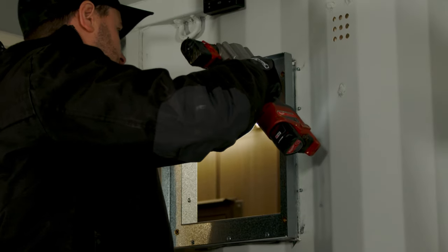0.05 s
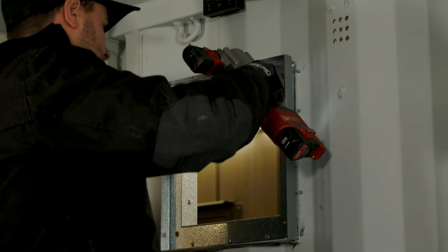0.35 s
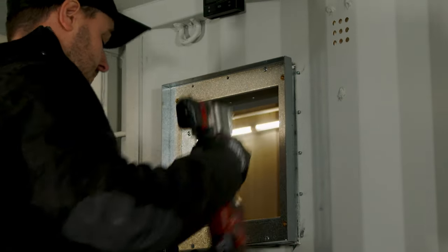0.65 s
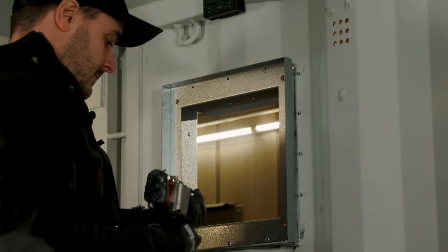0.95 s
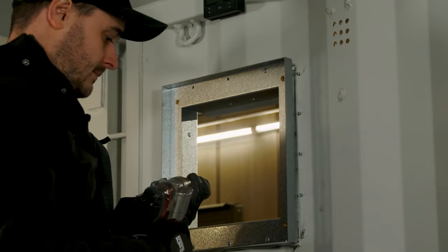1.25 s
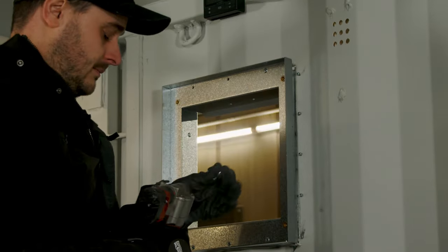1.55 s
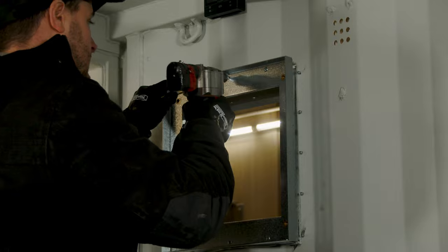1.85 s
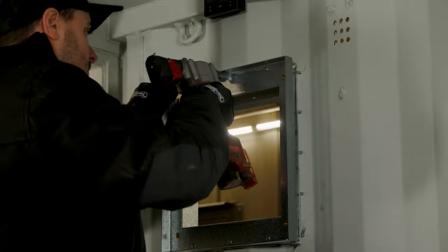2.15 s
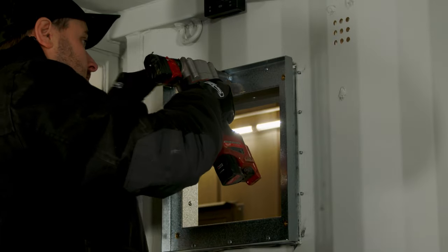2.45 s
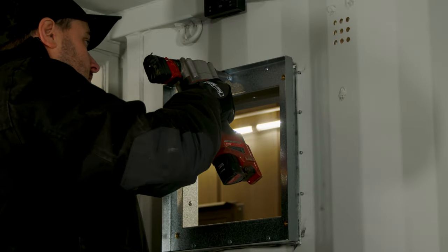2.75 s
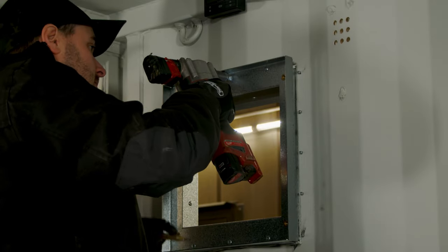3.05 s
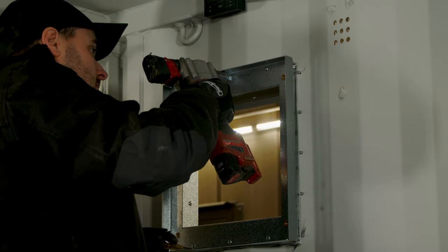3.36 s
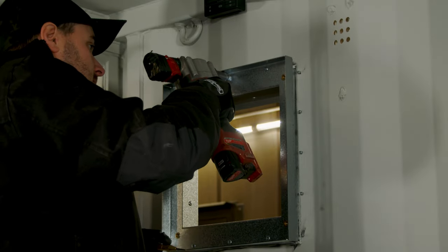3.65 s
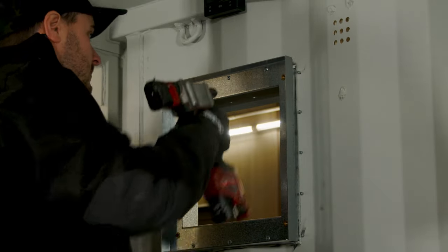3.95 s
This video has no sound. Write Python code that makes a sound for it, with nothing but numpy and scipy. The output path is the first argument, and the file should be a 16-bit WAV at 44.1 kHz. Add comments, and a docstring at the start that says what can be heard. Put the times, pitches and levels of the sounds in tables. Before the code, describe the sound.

A cordless rivet gun snaps a rivet right at the start, a sharp, close bang that rings through a steel container. Its geared motor whirs back until about 1.5 seconds. Light clicks and knocks against a steel window frame follow around 1.9 to 2.4 seconds. The motor spins up at 2.5, drops in pitch as it labours, and a second bang comes at 3.6, with the walls booming.

```python
"""A cordless rivet gun fixes a steel window frame, heard close up on one microphone in a shipping container.
Its geared motor spins up, labours as it pulls the rivet, snaps the mandrel with a bang, stops, runs back.
Between two rivets the tool is handled and its nose rattles into the next hole.
All around, the steel walls boom after the hard knocks, over a low rumble of air."""
import sys
import numpy as np
from scipy import signal
from scipy.fft import rfft, irfft
from scipy.io import wavfile
from scipy.ndimage import uniform_filter1d, map_coordinates

SR = 44100
rng = np.random.default_rng(int(sys.argv[2]) if len(sys.argv) > 2 else 0)


def unload_audio(sound):
    """Save the sound as a 16-bit wav file, at the path given as the first command line argument."""
    columns = np.transpose(np.atleast_2d(sound))
    # keep every value between -1 and 1, then stretch to whole-number steps
    steps = np.round(np.clip(columns, -1, 1) * 32767)
    wavfile.write(sys.argv[1], SR, steps.astype(np.int16))


N = 176400


def undb(db):
    return 10 ** (np.asarray(db) / 20)

def unit(x):
    return x / np.sqrt(np.mean(x ** 2))

def add(out, at, x):
    i = int(at * SR)
    out[i:i + len(x)] += x[:N - i]

def fade(t, t60):
    return np.exp(-np.log(1000) * t / t60)

def lookup(hz, table, column=1):
    """A column of a table, read on a log-frequency axis."""
    table = np.array(table)
    return np.interp(np.log(np.maximum(hz, 1)), np.log(table[:, 0]), table[:, column])

def colour(x, table):
    """Give a sound a spectrum, at rms 1."""
    gain = undb(lookup(np.fft.rfftfreq(len(x), 1 / SR), table))
    return unit(irfft(rfft(x) * gain, len(x)))

def walk(rate_hz):
    """A smooth random wander, at rms 1."""
    hold = max(int(SR / rate_hz), 1)
    steps = rng.standard_normal(4096)[np.arange(N) // hold % 4096]
    return unit(uniform_filter1d(steps, hold))

def burst(table, size=65536):
    """Noise that starts at rms 1; each half octave dies at its own rate."""
    t, f = np.arange(size) / SR, np.fft.rfftfreq(size, 1 / SR)
    spectrum = rfft(colour(rng.standard_normal(size), table))
    centres = np.geomspace(35, 17000, 19)
    band = np.interp(np.log(f + 1), np.log(centres), np.arange(len(centres)))
    return sum(irfft(spectrum * np.maximum(1 - abs(band - k), 0)) * fade(t, lookup(hz, table, column=2))
               for k, hz in enumerate(centres))

def ring(modes, size=65536):
    """Struck modes, each fading on its own."""
    t = np.arange(size) / SR
    return sum(undb(db) * rng.choice([-1, 1]) * np.sin(2 * np.pi * hz * t) * fade(t, t60)
               for hz, db, t60 in modes)

def click(hz, attack_s, t60, octaves=0.85, size=4096):
    """A small contact of metal parts, centred on one pitch; a slow attack makes a short scrape."""
    t, f = np.arange(size) / SR, np.fft.rfftfreq(size, 1 / SR)
    band = np.exp(-(np.log2((f + 1) / hz) / octaves) ** 2)
    noise = unit(irfft(rfft(rng.standard_normal(size)) * band))
    return noise * (1 - np.exp(-t / attack_s)) * fade(t, t60)


# Room tone in the container. Each row: frequency in Hz, relative level in dB.
AIR_SPECTRUM = [(25, -2), (80, 0.5), (170, 5), (420, -10.5), (1000, -19.5), (3000, -26), (8000, -28.5),
                (15000, -33.5)]

def air():
    """A faint, steady rumble all around the microphone."""
    return undb(-64.5) * colour(rng.standard_normal(N), AIR_SPECTRUM)


# The container's echo. Each row: frequency in Hz, relative level in dB, t60 in seconds.
ECHO_BANDS = [(60, 4.5, 0.51), (440, 10.5, 0.94), (841, -10, 0.94), (1996, 0.5, 0.46), (7000, -2, .38),
              (14840, -0.5, 0.41)]

def container_echo(sound):
    """What reaches the microphone by way of the steel walls."""
    echo = burst(ECHO_BANDS)
    return signal.fftconvolve(sound, echo / np.sqrt(np.sum(echo ** 2)))[:N]


# Booms after the hard knocks and bangs. Each row: start in seconds, level in dB.
BOOM_EVENTS = [(0.0678, -35), (1.855, -57), (2.07, -42), (3.587, -34.5)]
# The walls' bass. Each row: frequency in Hz, relative level in dB, t60 in seconds.
BOOM_BANDS = [(24.9, -11, 0.92), (52.6, -20, 0.91), (77.5, 5, 2.7), (113, -7, 2.4), (139, -5, 3.1),
              (194.4, 2.5, 2.2), (258, -33.5, 0.35)]

def wall_booms(peak_s=0.22, width_s=0.11):
    """Bending waves spread over the steel walls, so the bass swells late, then lingers softly."""
    out = np.zeros(N)
    for at, db in BOOM_EVENTS:
        boom = burst(BOOM_BANDS)
        t = np.arange(len(boom)) / SR
        swell = np.exp(-((t - peak_s) / width_s) ** 2)
        linger = 0.85 * np.minimum(t / peak_s, 1)
        add(out, at, undb(db) * boom * (swell + linger))
    return out


# Ticks and scrapes: small ones at the tool, and the bright edges of the knocks at the window at 1.855 and 2.15
# s. Each row: start in seconds, level in dB, centre in Hz, attack in seconds.
TICK_EVENTS = [(.766, -26, 2200, 0.0028), (1.185, -31, 2580, 0.0012), (1.308, -36, 2440, 0.0004),
               (1.541, -45, 2952, 0.0007), (1.608, -42, 5070, 0.0019), (1.638, -43, 2103, 0.0022),
               (1.657, -45.5, 2390, 0.0013), (1.855, -26, 11000, 0.0033), (2.15, -21.5, 6400, 0.0072),
               (2.408, -40, 3540, 0.0044), (2.462, -31.5, 4420, 0.0061)]

def ticks():
    """Mechanism and rivet make small, quickly damped clicks and scrapes; two of the knocks at the window get a
    bright, short contact."""
    out = np.zeros(N)
    for at, db, hz, attack_s in TICK_EVENTS:
        add(out, at, undb(db) * click(hz, attack_s, t60=0.02))
    return out


# Knocks at the window. Each row: start in seconds, click level in dB, click centre in Hz, thud level in dB.
KNOCK_EVENTS = [(1.854, -34, 9000, -39.5), (1.882, -44, 4000, -47), (1.923, -45, 1700, -44),
                (2.033, -43.5, 3460, -44), (2.055, -28, 3120, -38), (2.0653, -37, 3900, -39),
                (2.074, -32, 5730, -36), (2.099, -25, 1770, -35), (2.109, -34, 1800, -40.5),
                (2.175, -35.5, 3500, -65), (2.243, -48.5, 3950, -49)]
# The knocked steel. Each row of all three: frequency in Hz, relative level in dB, t60 in seconds.
CLINK_BANDS = [(202, -9, 0.14), (690, 0.5, 0.065), (1610, 4, 0.1), (2480, -4, 0.14), (3770, -0.5, 0.1),
               (6160, -13, 0.19), (8500, -21, 0.074), (15000, -20, 0.075)]
THUD_BANDS = [(50, -13, 0.32), (132, 1.5, 1), (360, -8, 1), (606, -12, 1), (1400, -12, 0.64),
              (3030, -28, 0.68), (9900, -28.5, 0.17)]
THUD_MODES = [(151, -2, 0.41), (378.6, -0.5, 0.45), (426, -5.5, 0.36)]

def knocks():
    """The tool meets the frame: a sharp contact, a clink of the steel and a dull thud."""
    out = np.zeros(N)
    for at, click_db, hz, thud_db in KNOCK_EVENTS:
        add(out, at, undb(click_db) * click(hz, attack_s=1 / SR, t60=0.0081))
        add(out, at, undb(click_db - 7) * burst(CLINK_BANDS, size=8192))
        thud = undb(-4.5) * burst(THUD_BANDS, size=32768) + ring(THUD_MODES, size=32768)
        add(out, at, undb(thud_db) * thud)
    return out


# Rubbing inside the tool. Each row: peak in seconds from the snap, spread in seconds, centre in Hz,
# width in Hz, level in dB.
RASP_BANDS = [(-.58, .12, 10270, 348.5, -53.5), (-.2, .16, 5355, 601, -50), (-.36, .2, 12440, 504, -56.5),
              (-.1, .09, 10930, 910, -55), (.56, 0.098, 9880, 1600, -58), (.74, 0.25, 5750, 811, -60),
              (.74, 0.19, 11200, 1500, -64), (1.29, 0.19, 6270, 600, -57)]

def rasps(drift=0.013, flutter_db=3):
    """Sliding parts rub while the motor runs: one resonance after another swells, wavers and fades."""
    out, t = np.zeros(N), np.arange(N) / SR
    for peak, spread, hz, width_hz, db in RASP_BANDS:
        phase = 2 * np.pi * np.cumsum(hz * (1 + drift * walk(13))) / SR
        band = walk(width_hz) * np.sin(phase) + walk(width_hz) * np.cos(phase)
        swell = sum(np.exp(-((t - at - peak) / spread) ** 2 / 2) for at, *_ in SNAP_EVENTS)
        out += band * undb(db + flutter_db * walk(35)) * swell
    start_and_brake = [PULL_STROKE[0][0], PULL_STROKE[1][0], RETURN_STROKE[-3][0], RETURN_STROKE[-2][0]]
    running = sum(np.interp(t - at, start_and_brake, [0, 1, 1, 0]) for at, *_ in SNAP_EVENTS)
    return out * running


# The gears' rattle, running free and under load. Each row: frequency in Hz, relative level in dB.
FREE_SPECTRUM = [(100, -15.5), (400, -1.5), (800, -3.5), (1150, -11.5), (1600, -4), (2250, 3), (2900, -2),
                 (3900, -3.5), (5100, -10.5), (6350, -6.5), (7000, -10), (8400, -18.5), (10500, -16),
                 (11800, -14.5), (15500, -19)]
LOADED_SPECTRUM = [(100, -13.5), (330, -13.5), (650, -1.5), (980, 4), (1200, -3), (1410, 4), (1630, -1.5),
                   (1920, 3.5), (2230, -5), (2480, -3), (3050, -12), (3500, -4), (4700, -5.5), (5400, -4),
                   (6200, -7), (8700, -16), (10300, -10), (12600, -12.5), (13500, -18), (15500, -19)]
PLANET_RATIO = 0.146  # planet turns per meshing tooth

def gear_rattle(hz, teeth, load, running, repeat_share=0.35):
    """Worn teeth scrape in a pattern that partly repeats as the gears turn; load shifts its colour."""
    mesh = 2 * np.pi * teeth
    wear = rng.standard_normal(1024)
    worn = map_coordinates(wear, [teeth * PLANET_RATIO / 2 % 1 * len(wear)], order=3, mode="grid-wrap")
    scrape = np.sqrt(repeat_share) * worn + np.sqrt(1 - repeat_share) * rng.standard_normal(N)
    pulsing = (1 + 0.19 * np.cos(mesh)) * (1 + 0.067 * np.cos(PLANET_RATIO * mesh))
    grit = undb(walk(400))
    scrape *= pulsing * grit
    # Each tooth partly repeats the scrape of the last, so the rattle follows the pitch.
    last_tooth = map_coordinates(scrape, [np.arange(N) - SR / hz], order=1, mode="nearest")
    scrape = (scrape + 0.13 * last_tooth) * running
    rattle = (1 - load) * colour(scrape, FREE_SPECTRUM) + load * colour(scrape, LOADED_SPECTRUM)
    return rattle * np.sqrt(running.mean())


# Gear overtones. Each row: multiple of the mesh rate, free and loaded levels in dB against the rattle.
OVERTONES = [(2, -9.5, -15), (3, -16, -14), (9, -21, -40)]
# Side tones of the planet gears. Each row: mesh multiple, planet turns added, dB against the rattle.
PLANET_TONES = [(1, -1, -17), (1, 1, -19), (2, -1, -21), (3, -1, -17), (3, -2, -14)]

def gear_whine(mesh, load, strain, whine_db, overtone_gain, flutter_db=3, radiate_hz=426):
    """Meshing teeth sing a fluttering stack of tones; the small housing radiates little of their bass."""
    depth_db = flutter_db * (0.5 + strain)
    overtones = sum(undb(free + (loaded - free) * strain + depth_db * walk(50)) * np.sin(round(k) * mesh)
                    for k, free, loaded in OVERTONES)
    planets = sum(undb(db + flutter_db * walk(30)) * np.sin((round(k) + round(j) * PLANET_RATIO) * mesh)
                  for k, j, db in PLANET_TONES)
    fundamental = undb(whine_db - 1.5 + depth_db * walk(40)) * np.sin(mesh)
    whine = fundamental + overtone_gain * (overtones + (1 - load) * planets)
    return signal.sosfilt(signal.butter(3, radiate_hz, "high", fs=SR, output="sos"), whine)


# The motor close up, pulling and running back. Each row: time in seconds from the snap, gear mesh rate
# in Hz, relative whine level in dB, rattle level in dB, load from 0 to 1.
PULL_STROKE = [(-1.11, 60, -68, -65, 0.86), (-1.08, 150, -52, -54, 0.76), (-1.04, 310, -73, -55, 0.52),
               (-.986, 460, -48.5, -51, 0.53), (-.936, 715, -48.5, -46.5, 0.51),
               (-.876, 780, -39, -43.5, 0.61), (-.786, 797, -39, -45.5, 0.42),
               (-.735, 788, -42.5, -41.5, 0.57), (-.675, 745, -50, -37.5, 0.89),
               (-.616, 610, -55, -37.5, 0.99), (-0.46, 490, -36, -37.5, 0.97),
               (-.45, 482, -48.5, -39, 0.87), (-.34, 485, -40, -37, 0.91), (-.22, 458, -52.5, -38.5, 1),
               (-.052, 482, -41, -38.5, 0.95), (0, 500, -47.5, -36, 0.96), (.03, 590, -54, -40, 0.5),
               (0.21, 1100, -63, -46.5, 0.8), (.24, 160, -76, -82, 0.6)]
RETURN_STROKE = [(.26, 59.9, -80, -60, 0.78), (.375, 203.5, -59, -59, 0.35), (.44, 555, -50, -51.5, 0.14),
                 (.51, 745, -52, -48, .25), (.57, 789, -46, -45.5, 0.18), (.7, 795.2, -49.5, -47, 0.25),
                 (.95, 800, -48, -48, 0), (1.18, 796.5, -44, -48.5, 0.18),
                 (1.432, 800, -45.5, -48.5, 0.068), (1.453, 639, -75, -48.5, 0),
                 (1.489, 149.9, -81, -98, 0)]

def motor_stroke(table, snap_s, surge_hz=10, spin_hz_per_s=4000, mute_s=0.28):
    """One run of the geared motor: whine over rattle, with a speed that wavers more under load."""
    t, rows = np.arange(N) / SR - snap_s, np.array(table)
    hz, whine_db, rattle_db, load = (np.interp(t, rows[:, 0], column) for column in rows.T[1:])
    running = (t > rows[0, 0]) & (t < rows[-1, 0])
    strain = load ** 4
    acceleration = uniform_filter1d(np.gradient(hz) * SR, size=2205)
    spin_up = np.sqrt(np.clip(acceleration / spin_hz_per_s, 0, 1) * hz / hz.max())
    jitter = 0.001 * walk(25) + 0.01985 * load * walk(120)
    surge = 0.018 * strain * np.sin(2 * np.pi * surge_hz * t)
    hz = hz * (1 + jitter + surge)
    teeth = np.cumsum(hz) / SR
    mesh = 2 * np.pi * teeth
    bite = np.maximum(strain, (hz / rows[:, 1].max()) ** 6)  # overtones grow with strain or speed
    tones = gear_whine(mesh, load, strain, whine_db, undb(rattle_db) * bite)
    tones += undb(-51) * spin_up * np.sin(3 * mesh)  # the third gear tone sings out while accelerating
    # The gear tones are muted briefly after the snap, leaving only the rattle.
    tones_on = (t < 0) | (t > mute_s)
    rattle = undb(rattle_db) * gear_rattle(hz, teeth, load, running)
    return running * (np.sqrt(2) * tones * tones_on + rattle)


# Mandrel breaks, close to the microphone. Each row: start in seconds, crack level in dB, wall level in dB.
SNAP_EVENTS = [(0.0687, -4, -19.5), (3.586, -4, -20.5)]
# Crack, wall and frame. Each row of all three: frequency in Hz, relative level in dB, t60 in seconds.
CRACK_BANDS = [(97.7, -12.5, 0.047), (471.6, 6, 0.13), (950, -5, 0.29), (2470, -0.5, 0.074),
               (5980, -1, 0.09), (8040, -12, 0.081), (11100, -2, 0.053), (16080, -2.5, 0.044)]
WALL_BANDS = [(49.2, -22.5, 1.2), (166, 7, 0.79), (247, -9.5, 1.52), (420, 2, 1.36), (1000, -5, 1.15),
              (2260, -9, 0.64), (5500, -16, 0.39), (8500, -18, 0.357), (15000, -13.5, 0.303)]
FRAME_MODES = [(169, -4.5, 1.6), (324, -4, 0.9), (436, -1.5, 1.4), (580, -1, 0.61), (638, -5, 1.4),
               (880, -5, 0.4), (1068, -2, 0.25), (1340, -5, 0.4), (1712, -3, 0.4), (2760, -2.5, 0.4),
               (4090, -6, 0.25), (6143, -1, .18)]

def mandrel_snaps(rise_s=0.0011):
    """The mandrel breaks: a hard crack, then frame and wall ring out."""
    out = np.zeros(N)
    for at, crack_db, wall_db in SNAP_EVENTS:
        crack = undb(crack_db) * burst(CRACK_BANDS)
        steel = undb(wall_db) * (burst(WALL_BANDS) + undb(-9) * ring(FRAME_MODES))
        onset = 1 - np.exp(-np.arange(len(crack)) / SR / rise_s)
        add(out, at, (crack + steel) * onset)
    return out


def scene():
    """The mono mix inside the container; motor, rasps and ticks also come back off the walls."""
    motor = sum(motor_stroke(table, at) for at, *_ in SNAP_EVENTS for table in (PULL_STROKE, RETURN_STROKE))
    tool = motor + rasps()
    ticking = ticks()
    background = container_echo(undb(-7) * tool + undb(-8) * ticking) + air()
    return (background + ticking + tool + mandrel_snaps() + knocks() + wall_booms())[None]

def record(dry, ceiling=0.94, top_hz=15800):
    """The recorder rounds off the bangs and cuts the top."""
    rounded = ceiling * np.tanh(dry / ceiling)
    return signal.fftconvolve(rounded, signal.firwin(301, top_hz, fs=SR)[None], mode="same")


dry = scene()
out = record(dry)
unload_audio(out)
```